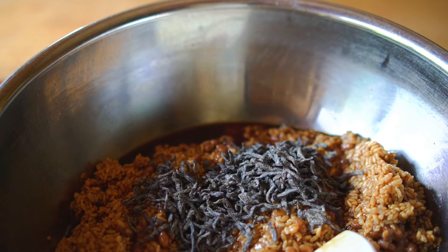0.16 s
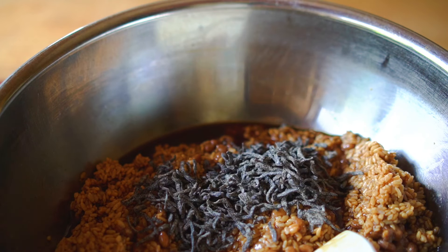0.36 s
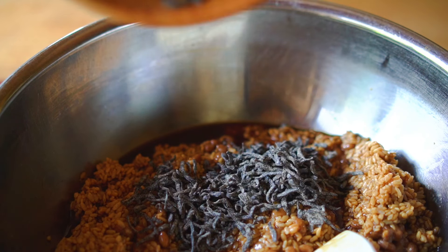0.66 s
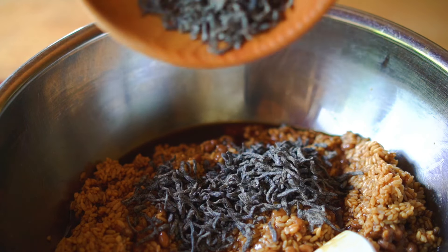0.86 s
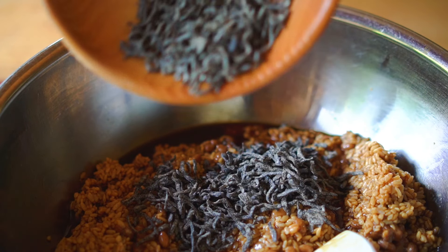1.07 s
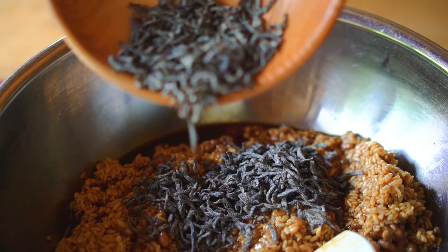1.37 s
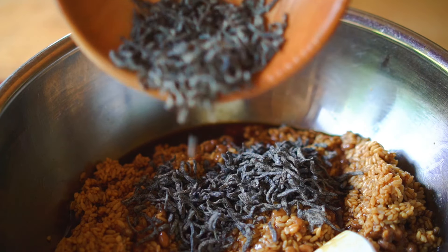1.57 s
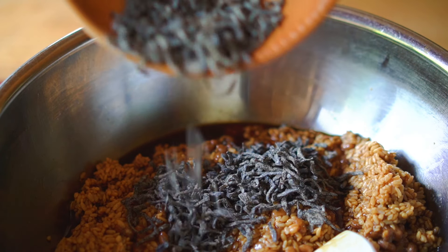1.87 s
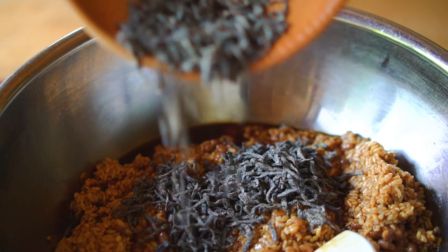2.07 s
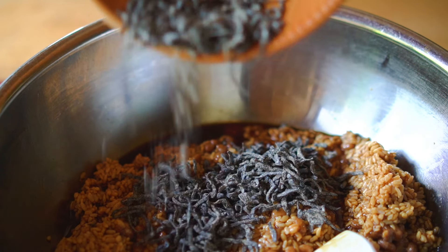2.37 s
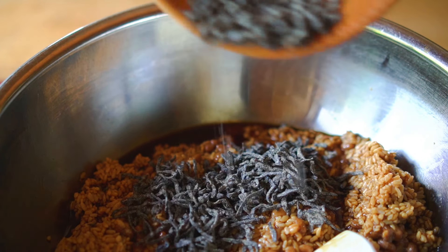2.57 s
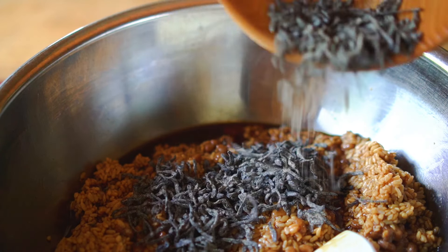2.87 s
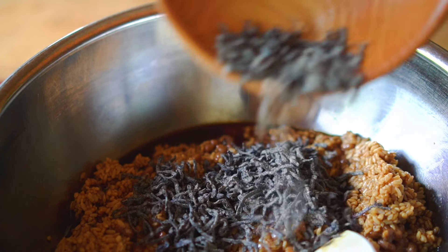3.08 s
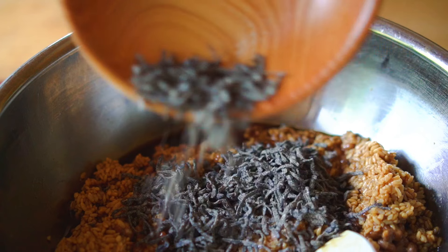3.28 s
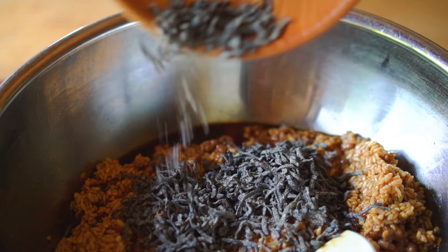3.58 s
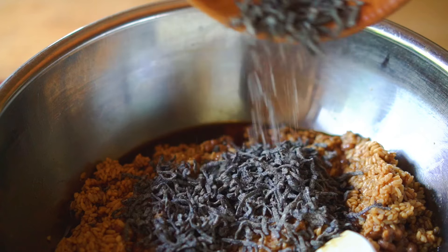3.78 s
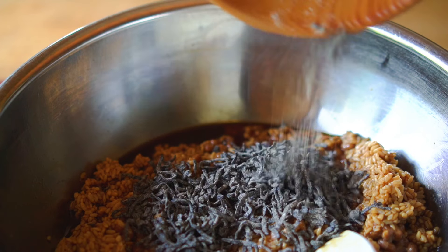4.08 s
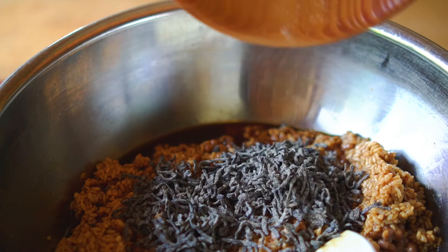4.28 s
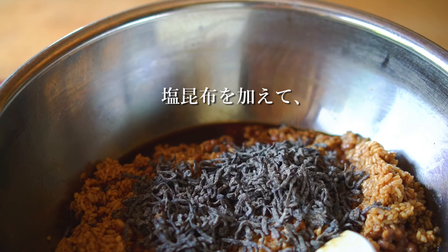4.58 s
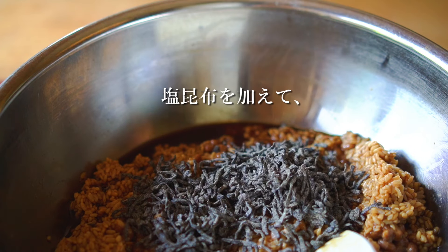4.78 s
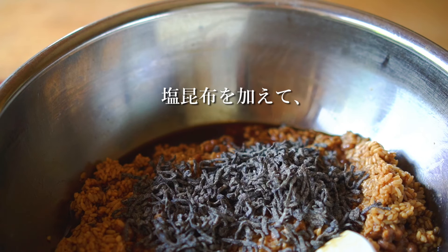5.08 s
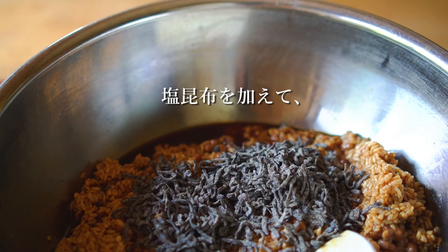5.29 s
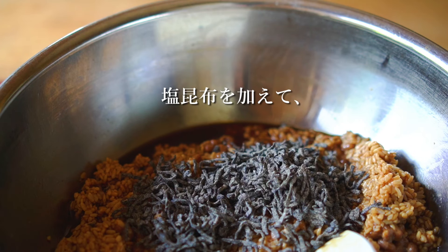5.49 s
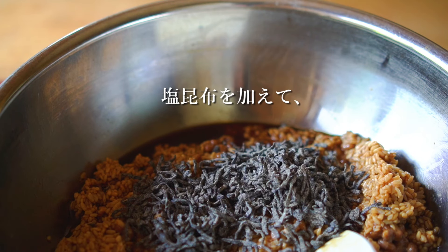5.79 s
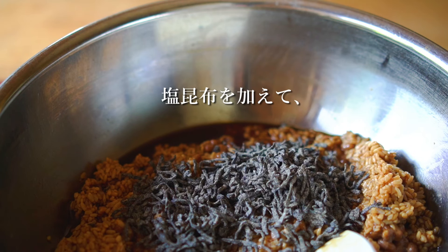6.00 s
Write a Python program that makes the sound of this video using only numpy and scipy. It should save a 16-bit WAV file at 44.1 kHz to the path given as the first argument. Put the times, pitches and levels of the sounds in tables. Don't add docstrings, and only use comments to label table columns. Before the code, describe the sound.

Crisp, bright rustling comes in waves as a small wooden dish of dry strips is shaken over a metal bowl, close up. Pieces tick and click as they land, with a few loud snaps and dull worktop thuds. The rattle fades to quiet room rumble and soft sleeve brushes; at the end a utensil knocks the steel hard, twice, with a short indoor echo.

```python
import sys
import numpy as np
from scipy import signal
from scipy.fft import rfft, irfft, next_fast_len
from scipy.io import wavfile
from scipy.ndimage import uniform_filter1d

SR = 44100
rng = np.random.default_rng(int(sys.argv[2]) if len(sys.argv) > 2 else 0)


def output_pcm(signal):
    pcm = np.clip(np.atleast_2d(signal).T, -1, 1) * 32767
    wavfile.write(sys.argv[1], SR, np.round(pcm).astype(np.int16))


def ratio_of_db(decibels):
    return 10 ** (np.asarray(decibels, float) / 20)


N = 270333


def rms_one(x):
    return x / np.sqrt(np.mean(x ** 2) + 1e-20)


def in_time(rows):
    s, *columns = np.transpose(rows)
    return [np.interp(np.arange(N) / SR, s, c) for c in columns]


def filtered(x, order, hz, side):
    return signal.sosfilt(signal.butter(order, hz, side, fs=SR, output="sos"), x)


def coloured(x, spectrum):
    size = next_fast_len(N)
    hz, level_db = np.transpose(spectrum)
    octave = np.log2(np.arange(size // 2 + 1) * SR / size + 1)
    below = np.maximum(np.log2(hz[0]) - octave, 0)
    above = np.maximum(octave - np.log2(hz[-1]), 0)
    gain = ratio_of_db(np.interp(octave, np.log2(hz), level_db) - 24 * (below + above))
    return rms_one(irfft(rfft(x, size) * gain, size)[:N])


def ring(clicks, hz, t60):
    r, w = ratio_of_db(-60 / (t60 * SR)), 2 * np.pi * hz / SR
    return signal.lfilter([0, np.sin(w)], [1, -2 * r * np.cos(w), r * r], clicks + 1e-18)


def grains(per_s, spread_db):
    sizes = ratio_of_db(spread_db * np.minimum(rng.exponential(1, N), 4.5)) * rng.choice([-1, 1], N)
    return rms_one(sizes * (rng.random(N) < per_s / SR))


def drift(rate):
    r = np.exp(-80 * np.pi * rate / SR)
    slow = signal.lfilter([1], [1, -2 * r, r * r], rng.standard_normal(N // 40 + 2002))[2000:]
    return np.repeat(rms_one(slow), 40)[:N]


def waves(rows, rise, flat):
    body, bright, t = np.zeros(N), np.zeros(N), np.arange(N) / SR
    for s, level_db, half_ms, bright_db, *own in rows:
        rise = np.clip(own[0] if own else rise, .2, 1.5)
        near = slice(max(int((s - .4) * SR), 0), int((s + .4) * SR))
        side = np.where(t[near] < s, rise, 2 - rise)
        phase = (t[near] - s) * 1000 / max(half_ms, 3) / side
        bell = ratio_of_db(2 * (level_db - 6.8 * np.abs(phase) ** flat))
        body[near] += bell
        bright[near] += bell * ratio_of_db(2 * bright_db)
    return body, bright


def kitchen():
    # (time [s], level [dB])
    swell = [(0, -42), (.12, -46), (1.38, -48), (2.0, -43.5), (2.34, -39.5), (2.62, -47.5), (3.26, -45),
             (3.74, -44.5), (4.0, -45.5), (4.42, -44.5), (4.61, -42.5), (4.73, -40), (4.92, -42),
             (5.12, -47), (5.36, -39), (5.7, -43), (6.13, -34)]
    # (frequency [Hz], level [dB per Hz])
    room_tone = [(28, -2.5), (45, -6), (62, 2), (78, -8), (97, 4), (125, -5), (160, -13), (220, -21.5),
                 (300, -23.5), (600, -43)]
    # (frequency [Hz], level [dB per Hz])
    hiss_colour = [(500, 4), (1500, -5), (3000, -13), (5000, -5.5), (7100, -8), (8500, -7.5), (10500, -3.5),
                   (12300, -9.5), (13700, -1.5), (15200, -5)]
    # (frequency [Hz], level [dB rms])
    whines = [(7127, -72), (13501, -77), (13873, -72), (14250, -70), (14626, -77)]
    swell_db, = in_time(swell)
    lumps_db = 1.2 * drift(6.0)
    rumble = ratio_of_db(swell_db + 2.0 + lumps_db) * coloured(rng.standard_normal(N), room_tone)
    hiss = ratio_of_db(-56.0) * coloured(rng.standard_normal(N), hiss_colour)
    t = np.arange(N) / SR
    whistles = sum(ratio_of_db(db + 3.0 + 1.5 * drift(4)) * np.sin(2 * np.pi * hz * t) for hz, db in whines)
    return rumble + hiss + whistles


def scuffs():
    # (time of peak [s], level [dB], half length [ms], centre [Hz])
    thumps = [(0.5, -59, 100, 534), (2.29, -49, 17, 650), (3.056, -46, 27, 570), (3.29, -53, 49, 580),
              (3.45, -55, 44, 380), (4.065, -42, 41, 330), (4.05, -50.5, 56, 690), (1.82, -54.5, 47, 380),
              (0.49, -52, 4, 1100), (3.255, -44, 13, 1560), (4.409, -48.5, 20, 290), (5.2, -47, 61, 255),
              (6.075, -53, 20, 400), (4.745, -60, 20, 1300)]
    out, t = np.zeros(N), np.arange(-.2 * SR, .2 * SR) / SR
    for (s, level_db, half_ms, hz), noise in zip(thumps, rng.standard_normal((len(thumps), len(t)))):
        band = rms_one(filtered(noise, 2, [hz / 1.93, hz * 1.22], "band"))
        bell = ratio_of_db(level_db - 6 * (t * 1000 / half_ms) ** 2)
        at = round((s + t[0]) * SR)
        out[at:at + len(t)] += (band * bell)[:N - at]
    return out


def sleeve():
    # (time of crest [s], level [dB], half length [ms], bright part [dB])
    strokes = [
        (4.47, -50.5, 9.3, 1),
        (4.58, -56.5, 230, -10),
        (4.645, -59.5, 19, 4),
        (4.72, -56, 97, -10),
        (4.92, -59, 110, -7),
        (5.05, -52, 65, -2.5),
        (5.26, -62, 140, -6),
        (6.075, -69, 34, 9),
    ]
    # (frequency [Hz], level [dB per Hz])
    dull_colour = [(900, -5), (1300, -3), (2200, -4), (3300, -3), (4300, -1), (4700, -19)]
    # (frequency [Hz], level [dB per Hz])
    bright_colour = [(3900, -6), (4300, 6), (4700, -5), (5500, -8), (6500, 1.5), (7200, -1), (8300, 3),
                     (9300, -10)]
    fibres = grains(per_s=12000, spread_db=3.5)
    dull, bright = np.sqrt(waves(strokes, rise=0.63, flat=1.65))
    return dull * coloured(fibres, dull_colour) + bright * coloured(fibres, bright_colour)


def knocks():
    # (time [s], blow on the steel [dB], push into the worktop [dB], push lag [ms],
    #          ring share [0-1], pitch of the thunk [ratio])
    blows = [
        (0.2938, -70, -16, 2.1, 0.14, 1),
        (1.16, -66, -29, 2.5, 0.07, 1),
        (2.974, -79, -16.5, 2.6, 0.01, 1),
        (4.042, -72, -17, 7.7, 0.21, 1),
        (4.391, -51, -18, 6.7, 1, 1),
        (5.8298, -5, 1, 9, 0.77, 1),
        (5.846, -16.5, -2, 1.7, 0.4, 1),
        (6.1259, -4, -14, 6, 0.7, 1.09),
    ]
    # (frequency [Hz], level [dB], time to fade by 60 dB [s])
    steel_modes = [(168, -8, .3), (198, -1, .29), (251, -8, .27), (290, 1, .22), (312, 0, .25),
                   (359, -7, .25), (387, 1, .3), (415, -3, .15), (452, -5, .3), (475, -7, .3),
                   (565, -4, .28), (600, -3.5, .3), (630, -8, .23), (705, -21, .3), (790, -15, .25),
                   (846, -14, .28), (985, -11, .33), (1077, -7, .15), (1180, -14, .4), (1303, -17, .28),
                   (1604, -27, .24), (1850, -24, .14), (1965, -28, .16), (2640, -27, .3), (3530, -27, .22)]
    # (frequency [Hz], level [dB], time to fade by 60 dB [s])
    worktop_modes = [(46, -7, .4), (58, -12, .5), (64.6, 0, .65), (81, -15, .4), (95, -10, .45),
                     (108, -11, .35), (135, -19, .4)]
    # (frequency [Hz], level [dB], time to fade by 60 dB [s])
    thunk_modes = [(301, -4.5, 0.093), (437, 5, 0.041), (546, -6, 0.027), (947, -15, 0.024),
                   (1290, -20, 0.03)]
    # (frequency [Hz], level [dB per Hz])
    echo_colour = [(150, -13), (350, -3), (700, -10), (1300, -19.5), (1850, -33.5), (2200, -42),
                   (2680, -30), (3100, -48), (3520, -29), (3900, -45), (4200, -43), (5000, -46)]
    near_t60_s, late_db, late_t60_s = 0.44, -18, 0.7
    contact_ms, softer = 0.15, 0.31
    settle_s, settle_db_per_s = 0.12, 400
    out, echo = np.zeros(N), coloured(rng.standard_normal(N), echo_colour)
    for s, blow_db, push_db, lag_ms, share, pitch in blows:
        at = round(s * SR)
        t = np.arange(min(N - at, int(.4 * SR))) / SR
        share = np.clip(share, .05, 1)

        steel = 0
        for k, (hz, db, t60) in enumerate(steel_modes):
            fade = ratio_of_db(db - 14.0 - 60 * t / (t60 * share))
            steel = steel + (-1) ** k * fade * np.sin(2 * np.pi * hz * t)
        steel = steel * np.minimum(t / 0.0029, 1)
        thunk = sum(ratio_of_db(db - 60 * t / t60) * np.sin(2 * np.pi * hz * pitch * t) for hz, db, t60 in thunk_modes)
        thunk = thunk * np.minimum(t / 0.0042, 1)
        fade = ratio_of_db(-60 * t / (near_t60_s * share)) + ratio_of_db(late_db - 60 * t / late_t60_s)
        room = ratio_of_db(-16.0) * echo[at:at + len(t)] * fade * np.minimum(t / 0.0023, 1)
        soft = np.exp(-1000 / (contact_ms * ratio_of_db(-softer * blow_db) * 0.3 * SR))
        blow = signal.lfilter([1 - soft], [1, -soft], ratio_of_db(-0.5) * steel + thunk + room)

        late = np.maximum(t - lag_ms / 1000, 0)
        push = -sum(ratio_of_db(db - 60 * late / (t60 * share)) * np.sin(2 * np.pi * hz * late)
                    for hz, db, t60 in worktop_modes)
        push = push * ratio_of_db(-settle_db_per_s * np.maximum(late - settle_s, 0))
        push = push * (1 - np.exp(-late / 0.0086))
        out[at:at + len(t)] += ratio_of_db(blow_db) * blow + ratio_of_db(push_db - 0.5) * push
    return out


def ticks():
    # (time [s], peak [dB], pitch [Hz], click [dB])
    snaps = [(1.8697, -20, 2700, -6), (2.0597, -12, 2700, -2), (2.1868, -9, 2700, 3),
             (2.194, -1.5, 3920, -5), (2.2835, -6.5, 2630, -15), (2.2984, -8, 4440, -5),
             (2.9695, -1, 5000, 0), (3.1383, -3, 3320, -4), (3.2406, -6, 3800, -3), (3.256, -2.5, 4100, -3),
             (3.3004, -5, 3900, -10), (4.4668, -30, 4430, 2), (4.6427, -14, 10850, -18),
             (4.6429, -23, 8850, -25)]
    t60_ms, dull_hz = 6.7, 9000
    out, t = np.zeros(N + 900), np.arange(900) / SR
    for (s, peak_db, hz, click_db), noise in zip(snaps, rng.standard_normal((len(snaps), 900))):
        fade = ratio_of_db(-60000 * t / t60_ms * np.sqrt(hz / 4000)) * np.minimum(t / .0002, 1)
        click = ratio_of_db(click_db) * filtered(noise, 2, dull_hz, "low") * np.exp(-t / 0.00041)
        at = round(s * SR)
        out[at:at + 900] += ratio_of_db(peak_db - 7.5) * (fade * np.sin(2 * np.pi * hz * t) + click)
    return filtered(out[:N], 3, 1800, "high")


def drops():
    # (time [s], peak [dB], pitch [Hz])
    clear_drops = [(0.0726, -31, 5050), (0.4232, -21, 5120), (0.604, -25, 6230), (1.3228, -24, 5000),
                   (1.3413, -29, 6430), (1.3725, -30, 4090), (1.4568, -25, 4720), (1.6485, -7, 6380),
                   (1.694, -18, 5880), (1.7619, -14, 9650), (1.7733, -14, 6610), (1.7806, -14, 6710),
                   (1.8054, -15, 6700), (1.8134, -18, 8880), (1.8251, -18, 9930), (1.8342, -21, 8100),
                   (1.853, -19, 8530), (1.8696, -7, 7780), (1.8789, -17, 7750), (1.8827, -17, 7440),
                   (1.9272, -10, 8000), (1.9935, -13, 6570), (2.0208, -9, 8470), (2.0244, -10, 9560),
                   (2.1686, -6, 7250), (2.1873, -11, 8820), (2.3255, -13, 9480), (2.3602, -12, 8060),
                   (2.3971, -24, 6400), (2.4269, -19, 5110), (2.4463, -25, 10040), (2.4666, -24, 12050),
                   (2.4806, -26, 7950), (2.4888, -26, 5740), (2.4958, -20, 8040), (2.503, -22, 8290),
                   (2.5094, -27, 9030), (2.5189, -26, 9130), (2.5364, -30, 10510), (2.588, -22, 7590),
                   (2.6559, -18, 6250), (2.7141, -18, 10710), (2.7193, -21, 6930), (2.7283, -18, 9800),
                   (2.733, -19, 8700), (2.7385, -22, 7870), (2.7471, -20, 10230), (2.8145, -21, 10610),
                   (2.8299, -15, 7360), (2.86, -21, 11540), (2.9467, -21, 7190), (2.9927, -15, 6260),
                   (3.0096, -17, 9510), (3.0683, -13, 8820), (3.1331, -17, 7980), (3.1521, -20, 5440),
                  (3.1569, -18, 5010), (3.2227, -22, 8890), (3.2771, -18, 7300), (3.286, -20, 6160),
                  (3.294, -14, 7530), (3.313, -18, 6830), (3.3755, -13, 8030), (3.4111, -20, 8480),
                  (3.4298, -20, 9970), (3.4578, -21, 5800), (3.4816, -25, 9550), (3.508, -24, 12340),
                  (3.5187, -24, 11520), (3.5264, -25, 7680), (3.5317, -24, 10740), (3.5422, -22, 8190),
                  (3.6191, -14, 8240), (3.6222, -23, 5480), (3.6382, -25, 7330), (3.6512, -25, 7610),
                  (3.6588, -25, 6120), (3.6729, -21, 7980), (3.7192, -15, 8480), (3.7598, -20, 9750),
                  (3.7707, -23, 10300), (3.8358, -13, 8250), (3.8596, -18, 8260), (3.8903, -18, 6910),
                  (3.9, -18, 6030), (3.9109, -15, 6710), (3.9697, -16, 10710), (4.0096, -20, 6480),
                  (4.0346, -22, 7490), (4.0431, -21, 7140), (4.0628, -18, 7850), (4.091, -22, 9730),
                  (4.0951, -24, 7550), (4.0998, -21, 10050), (4.1049, -21, 8480), (4.115, -15, 10020),
                  (4.1423, -23, 11060), (4.1484, -25, 7860), (4.1634, -30, 7220), (4.1796, -27, 9210),
                  (4.1889, -23, 11650), (4.1925, -23, 13800), (4.1949, -16.5, 10500), (4.2144, -29, 8620),
                  (4.2319, -34, 11720)]
    cycles, click_db, click_ms = 6.0, -3, .25
    scatter_db, scatter_ms = -16, 1.5
    rows = clear_drops
    out, t = np.zeros(N), np.arange(200) / SR
    for (s, peak_db, hz), noise in zip(rows, rng.standard_normal((len(rows), 200))):
        at = round(s * SR) - 3
        tone = ratio_of_db(-60 * t * hz / cycles) * np.sin(2 * np.pi * hz * t)
        click = ratio_of_db(click_db) * noise * np.exp(-1000 * t / click_ms)
        scatter = ratio_of_db(scatter_db) * noise[::-1] * np.exp(-1000 * t / scatter_ms)
        landing = filtered(tone + click + scatter, 3, 3000, "high")
        out[at:at + 200] += ratio_of_db(peak_db - 0.7) * landing / np.abs(landing).max()
    return out


def landings():
    # (time [s], landings per second [1/s], level [dB])
    fall = [
        (1.4, 29, -67),
        (1.75, 90, -27.5),
        (2.2, 340, -34),
        (2.5, 60, -40),
        (2.9, 85, -44),
        (3.27, 670, -41),
        (3.62, 240, -39.5),
        (4.02, 260, -38),
        (4.13, 100, -40),
    ]
    per_s, level_db = in_time(fall)
    t = np.arange(N) / SR
    falling = (t > fall[0][0]) * (t < fall[-1][0])
    clicks = grains(per_s * 2 * ratio_of_db(3.5 * drift(15.0)) * falling, spread_db=1.2)
    pitches, dealt = np.geomspace(4000, 14500, 10), rng.integers(0, 10, N)
    rings = sum(ring(clicks * (dealt == k), hz, 2.3 / hz) * 5000 / hz for k, hz in enumerate(pitches))
    return ratio_of_db(level_db - 8.0) * rms_one(np.diff(rings, n=2, prepend=[0, 0]))


def heap_thuds(shared):
    # (time [s], level [dB], upper part [dB], hollow ring [dB])
    clumps = [(.1, 0, -10, -10), (.3, 5.5, -5, -10), (.5, 2.5, -19, -1), (.7, -0.5, -19, -8),
              (.9, 2, -2, 3.5), (1.15, 3, -3, -4), (1.4, 4.5, 4, 0), (1.55, -1.5, 3, -6), (1.9, 4, 5, -1),
              (2.2, 0, 3, 1), (2.45, 2, 1, -11), (2.58, -2.5, -5, 12), (2.72, -1.5, 7, -6),
              (2.9, 2.5, -0.5, 4), (3.15, 5.5, 3, -18), (3.28, 6.5, 7.5, 1), (3.55, -4.5, 5, -12),
              (4.0, 2.5, -1, -4)]
    # (frequency [Hz], level [dB per Hz])
    heap_colour = [(200, 5.5), (350, -3), (700, -2), (1250, 4.5), (1600, -1), (2100, 2), (2600, -1)]
    weight_db, upper_db, hollow_db = in_time(clumps)
    thuds = coloured(grains(per_s=3000, spread_db=3.0), heap_colour)
    low, high = (filtered(thuds, 5, 1720, side) for side in ("low", "high"))
    hollow = rms_one(ring(shared, hz=1240, t60=0.032))
    return ratio_of_db(weight_db - 32.0) * (low + ratio_of_db(upper_db) * high + ratio_of_db(hollow_db - 8.5) * hollow)


def dry_crackle(shared):
    # (frequency [Hz], level [dB per Hz])
    crackle_colour = [(2300, 9), (3000, -12), (4800, -2.5), (6000, 0), (8000, 1.5), (9600, 0.5),
                      (10100, -4), (10800, -0.5), (13000, -2), (15000, -2)]
    dry = coloured(1.1 * shared + grains(per_s=9000, spread_db=2.5), crackle_colour)
    edges = np.geomspace(2500, 16000, 15)
    dry = sum(ratio_of_db(3.04 * drift(5.6)) * filtered(dry, 2, band, "band") * (-1) ** k
              for k, band in enumerate(zip(edges, edges[1:])))
    return filtered(dry, 4, 2300, "high")


def dish_ring(shared):
    # (frequency [Hz], width [Hz], level [dB])
    modes = [(2530, 290, -1), (2700, 198, 7.5), (3415, 127, 5), (3544, 480, 1.5), (4178, 284, 6.5),
             (4434, 145, 6), (5064, 150, -3), (5440, 280, -0.5), (6600, 236, 3), (8080, 860, -12),
             (8080, 950, -4.5), (9600, 170, -10), (10630, 220, -10), (12700, 1600, -29), (13600, 270, -30)]
    # (time [s], second ring [dB], deepest ring [dB], third ring [dB])
    hold = [(0, 15.5, -6, 8), (.12, 12, -7, 4), (.22, 10, -12, 0), (.3, 0, -12, 1.5), (.45, 8.5, -5, -5),
            (.56, 1.5, -1.5, 1), (.7, -1, -3.5, 3), (.87, -0.5, -5.5, -0.5), (1.15, 3.5, -5.5, 1),
            (1.4, 1, -6, 1), (1.75, -0.5, -5.5, 0), (2.1, 2, -4.5, 0), (2.4, 1.5, -5.5, 1.5),
            (2.7, 3, -4.5, 1), (2.9, 2.5, -5, 1.5), (3.2, 3.5, -4, -1.5), (3.8, 5, -5.5, 3),
            (4.3, 4, -16, 2)]
    second_db, deepest_db, third_db = in_time(hold)
    grip_db = {1: deepest_db + 9.0, 2: second_db, 3: second_db, 4: third_db, 5: third_db}
    others = [grains(per_s=5000, spread_db=4.0) for _ in range(3)]
    dish = 0
    for k, (hz, width, level_db) in enumerate(modes):
        own = (0.83 * shared + 0.58 * others[k % 3]) * ratio_of_db(1.2 * drift(15.0))
        tone = np.sqrt(width) * rms_one(ring(own, hz, 4.2 / width))
        dish = dish + (-1) ** k * ratio_of_db(grip_db.get(k, 0) + level_db) * tone
    return filtered(rms_one(dish), 6, 2350, "high")


def strips():
    # (time [s], level [dB])
    trickle = [(0, -65), (.11, -40), (.27, -55), (.52, -29.5), (.64, -48), (.81, -45), (.95, -31.5),
               (1.24, -38), (1.41, -49.5), (1.7, -37.5), (2.2, -29.5), (2.4, -37), (2.53, -48.5),
               (2.8, -38), (3.2, -32.5), (3.56, -42), (4.03, -34), (4.27, -60)]
    # (time of crest [s], level [dB], half length [ms],
    #                                    dry crackle [dB], rise share [ratio])
    loosen = [(0.082, -42, 18, -25, 0.66), (0.14, -43.5, 100, -4.5, 0.54), (0.237, -31.5, 19, 0.5, 0.35),
              (0.301, -31.5, 33, -1.5, .25), (0.46, -24.5, 40, -2, 0.8), (0.568, -26, 26, -5, 0.76),
              (0.689, -24.5, 41, -6, 0.5), (0.866, -24.5, 31.6, -4.5, 0.65), (1.01, -33, 40, -8, 0.72),
              (1.153, -21.5, 43.4, -4.5, 0.85), (1.263, -24.5, 23.7, -4, 0.75),
              (1.315, -34.5, 32, -17, 0.88), (1.376, -38.5, 13.5, -29, 0.97),
              (1.455, -32.5, 14.4, -32, 0.96)]
    # (time of crest [s], level [dB],
    # half length [ms], dry crackle [dB])
    pour = [(1.523, -23.5, 27.3, -6.5), (1.58, -18, 21, -6.5), (1.653, -21, 30.3, -6.5),
            (1.727, -24.5, 26, -2.5), (1.792, -30.5, 29, -2.5), (1.87, -27, 12, -8), (1.94, -27.5, 18, 1),
            (2.01, -25, 20, 1), (2.075, -23, 30.5, -1.5), (2.154, -25.5, 20, 2.5), (2.225, -27, 35, -0.5),
            (2.292, -24, 21.4, -3.5), (2.358, -28, 23, -3), (2.414, -33, 26, -19),
            (2.569, -33, 10, -31), (2.637, -29, 30, -3.5), (2.702, -29, 25, -5), (2.774, -30, 25, -4),
             (2.834, -25.5, 15, -5.5), (2.901, -24.5, 29, -2.5), (2.975, -24.5, 23, -3),
             (3.034, -23.5, 22, -4.5), (3.086, -30.5, 41, -4), (3.178, -26.5, 20, -7), (3.25, -27, 16, -5),
             (3.305, -29, 23, -7.5), (3.382, -27.5, 16, -3.5), (3.44, -33.5, 35, -3.5),
             (3.586, -37, 14, -4), (3.6215, -32, 2.6, -3.5), (3.706, -31.5, 28, 0.5), (3.759, -33, 3, 1),
             (3.772, -42, 3, 4), (3.826, -30, 32, 0.5), (3.93, -31, 52, -1.5), (4.108, -40, 11, 8),
             (4.151, -51, 6.1, 0), (4.163, -54, 4, 6), (4.18, -54, 3, 8), (4.197, -49, 5.5, 12),
             (4.212, -54, 5, 8), (4.23, -60, 8, 8), (6.085, -53.5, 37, -25)]
    trickle_db, = in_time(trickle)
    t = np.arange(N) / SR
    dry_db = trickle_db - 14 + 2.5 * t
    pouring = np.arange(N) < trickle[-1][0] * SR
    slow_shakes = waves(loosen, rise=0.99, flat=2.46)
    quick_shakes = waves(pour, rise=0.99, flat=2.39)
    body, crackle = np.add(slow_shakes, quick_shakes)
    body = np.sqrt(body + pouring * ratio_of_db(2 * (trickle_db - 0.5)))
    crackle = np.sqrt(crackle + pouring * ratio_of_db(2 * dry_db))

    shared = grains(per_s=9000, spread_db=4.0)
    dish = ratio_of_db(-3.0 + 0.5 * drift(50.0)) * body * dish_ring(shared)
    dry = ratio_of_db(-1.36 + 0.7 * drift(50.0)) * crackle * dry_crackle(shared)
    mean_flow = uniform_filter1d(body, int(0.17 * SR)).clip(0)
    heap = heap_thuds(shared) * pouring * mean_flow ** 0.68
    pulse = 0.36 + 0.55 * body / (uniform_filter1d(body, size=8000) + 1e-5)
    return dish + dry + heap * pulse


def scene():
    background = kitchen() + scuffs() + sleeve()
    return (background + knocks() + ticks() + drops() + landings() + strips())[None]


def band_limit(x):
    return signal.sosfilt(signal.butter(12, 15750, fs=SR, output="sos"), x)


def record(dry):
    rounded = 1.177 * np.tanh(dry / 1.201)
    no_top = signal.sosfilt(signal.ellip(10, .5, 55, 15050, fs=SR, output="sos"), rounded)
    mix = filtered(no_top, 2, 30, "high")
    return band_limit(mix)


dry = scene()
out = record(dry)
output_pcm(out)
```